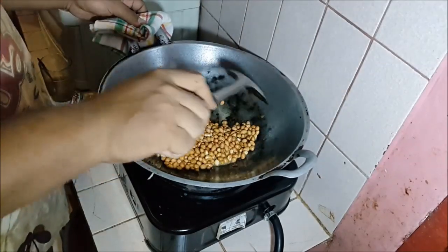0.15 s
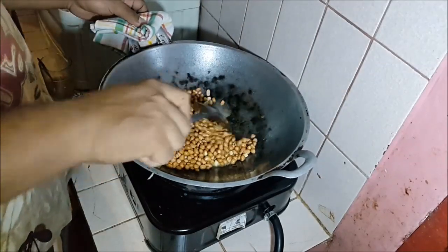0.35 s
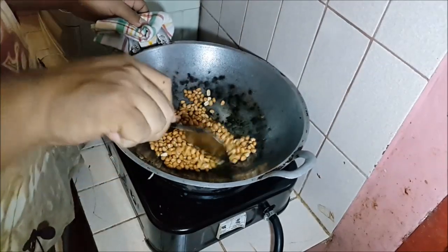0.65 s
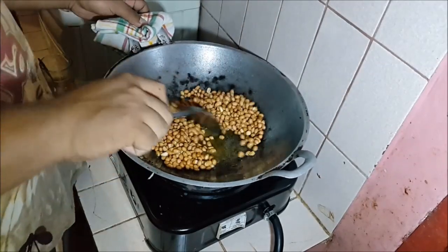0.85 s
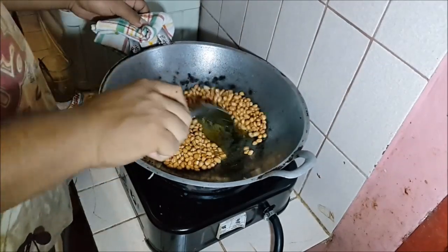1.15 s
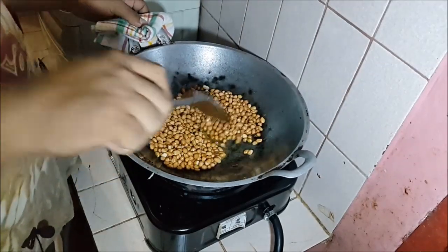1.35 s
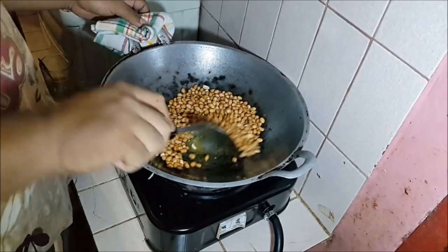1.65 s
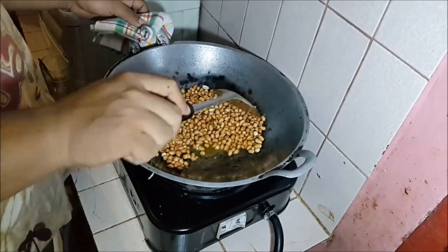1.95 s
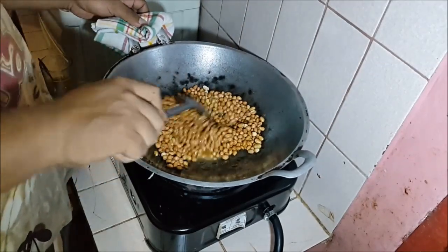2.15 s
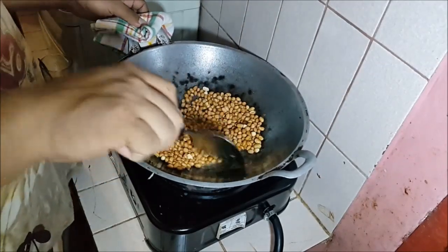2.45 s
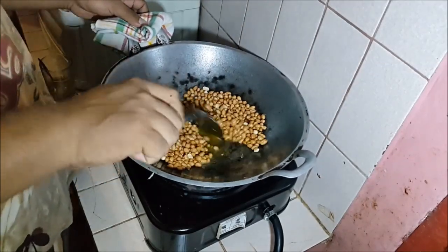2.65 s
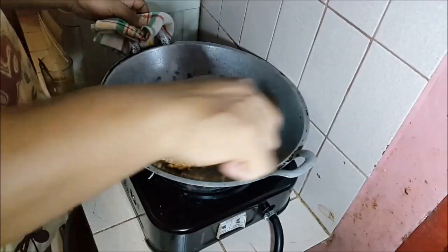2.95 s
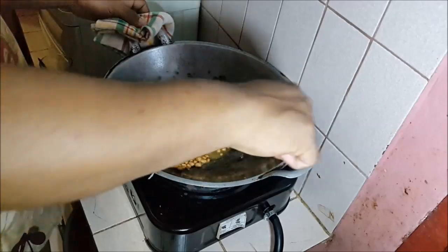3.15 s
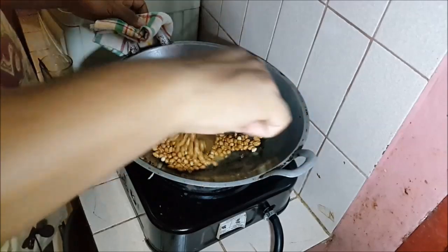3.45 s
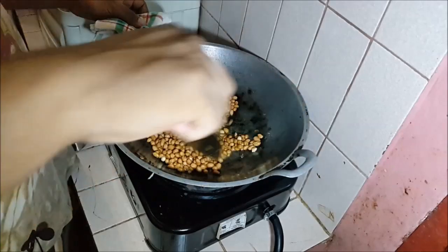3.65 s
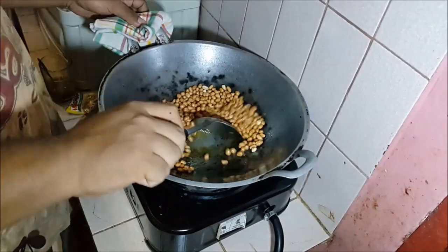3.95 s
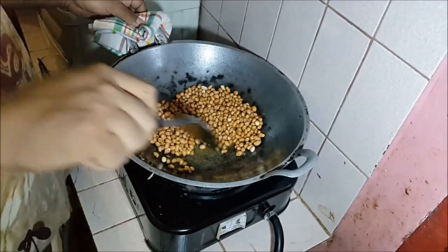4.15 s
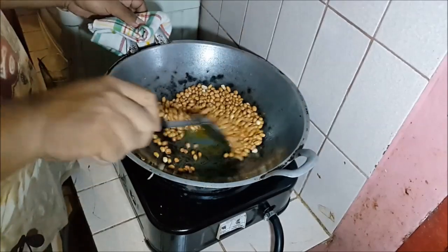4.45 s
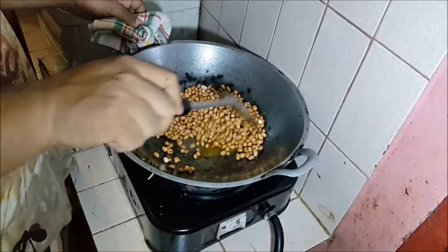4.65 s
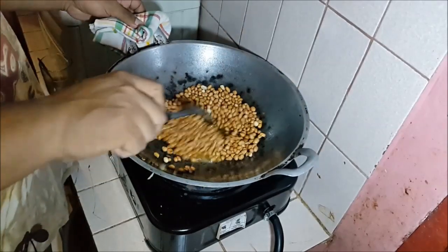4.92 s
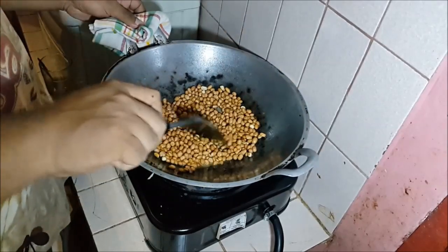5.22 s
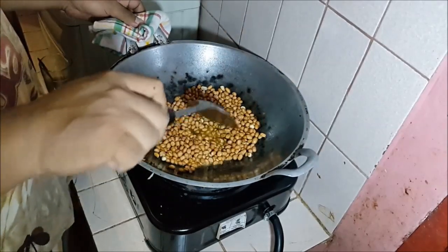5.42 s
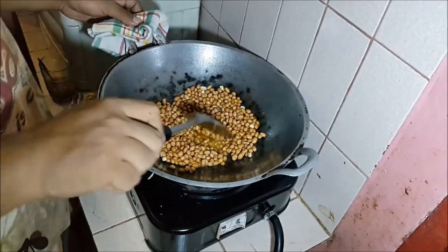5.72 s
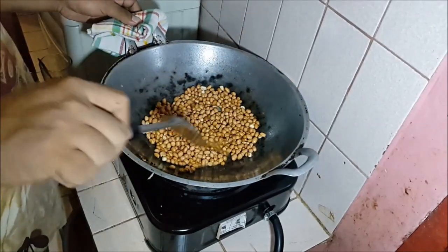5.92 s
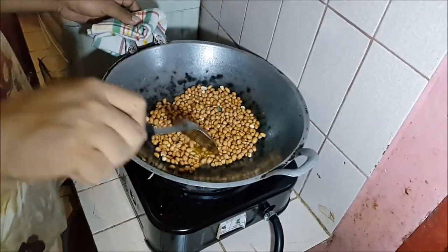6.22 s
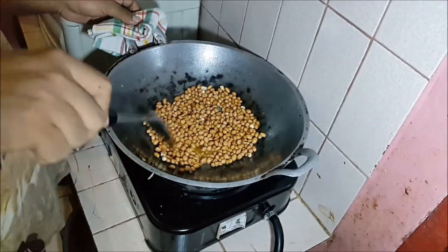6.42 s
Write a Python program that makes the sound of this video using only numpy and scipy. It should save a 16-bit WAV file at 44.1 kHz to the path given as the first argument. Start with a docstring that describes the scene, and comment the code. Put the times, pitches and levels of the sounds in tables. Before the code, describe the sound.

Close, dry-sounding stirring: the blade touches down with a short ring, pushes with a dull thud and rasps through a heap of nuts, then the steel wok bangs on its grate with a dense clang and duller rebounds. Knocks cluster in the first two seconds and recur irregularly. A gritty descending scrape comes midway; the end is softer thuds and clinks. Thin sizzle and low flame rumble lie beneath, with brief tile reflections.

```python
"""A metal spatula touches down and scrapes through peanuts frying in oil in a wok on a gas stove.
The wok knocks and chatters on the grate: struck modes, dense ringing and duller rebounds.
Blade landings ring, pushes thud, stick-slip grains scrape, and single nuts and a heap of them click.
Below lie sizzling oil (bubble and droplet bursts) and the burner's rumble (filtered noise).
Close tiled walls add a short echo; a left-right difference widens the stereo."""
import sys
import numpy as np
from scipy import signal
from scipy.fft import rfft, irfft
from scipy.io import wavfile
from scipy.ndimage import uniform_filter1d, minimum_filter1d

SR = 44100
rng = np.random.default_rng(int(sys.argv[2]) if len(sys.argv) > 2 else 0)


def generate_wav(sig):
    """Save sig (samples, or channels by samples) to the path in sys.argv[1] as 16-bit PCM at SR."""
    pcm = np.round(np.clip(np.atleast_2d(sig).T, -1, 1) * 32767).astype(np.int16)
    wavfile.write(sys.argv[1], SR, pcm)


N = 290160
TAIL_S = np.arange(SR * 3 // 4) / SR  # time axis of one blow


def amp(db):
    """Decibels to gain."""
    return 10 ** (np.asarray(db) / 20)


def unit(x):
    """Scales to rms 1."""
    return x / np.sqrt(np.mean(x ** 2) + 1e-20)


def read(points, hz):
    """Interpolates a spectrum table on a log-frequency axis."""
    f, value = np.transpose(points)
    return np.interp(np.log(hz + 1), np.log(f + 1), value)


def follow(rows):
    """Interpolates a (s, level dB) curve at every sample."""
    s, db = np.transpose(rows)
    return np.interp(np.arange(N) / SR, s, db)


def add(mix, s, sound):
    """Adds a sound at time s, cut at the end of the mix."""
    part = mix[max(round(s * SR), 0):][:len(sound)]
    part += sound[:len(part)]


def colour(x, points):
    """Filters by a spectrum table, with zero phase."""
    gain_db = read(points, np.fft.rfftfreq(len(x), 1 / SR))
    return irfft(rfft(x) * amp(gain_db), len(x))


def causal(x, points):
    """Minimum-phase colour: no sound before the blow; keeps the power of white noise."""
    hz = abs(np.fft.fftfreq(4096, 1 / SR))
    gain = np.maximum(unit(amp(read(points, hz))), 1e-5)
    taps = np.fft.ifft(np.exp(np.conj(signal.hilbert(np.log(gain))))).real
    return signal.fftconvolve(x, taps[:len(taps) // 2])[:len(x)]


def treble(hz, corner_hz):
    """Share 0-1 of a frequency that lies above a soft corner."""
    return 1 / (1 + (corner_hz / (hz + 1)) ** 5)


def grains(per_s, spread_db, count=N):
    """Random clicks of either sign at rms 1, their sizes spread exponentially in dB."""
    size = amp(spread_db * np.minimum(rng.exponential(1, count), 5))
    hit = rng.random(count) < per_s / SR
    return unit(size * rng.choice([-1, 1], count) * hit)


def snap(fall_s, after_db):
    """A sharp click followed by a brief scatter, total energy 1."""
    scatter = unit(rng.standard_normal(len(TAIL_S)) * np.exp(-TAIL_S / fall_s))
    click = amp(after_db) * scatter / np.sqrt(len(TAIL_S))
    click[0] += 1
    return click / np.linalg.norm(click)


def shifting(x, depth_db):
    """As the contact point moves, patches of resonance come and go."""
    z = signal.stft(x, SR, nperseg=512)[2]
    field = rng.standard_normal(z.shape)
    for _ in range(2):
        field = uniform_filter1d(field, size=3, axis=0)  # across frequency
        field = uniform_filter1d(field, size=7, axis=1)  # across time
    patches = unit(amp(depth_db * unit(field)))
    return signal.istft(z * patches, SR, nperseg=512)[1][:len(x)]


def ring(modes, weight=np.zeros_like, spread_db=0.5):
    """Dying sines; each blow lands elsewhere and weights them anew."""
    hz, db, t60_s = np.transpose(modes)
    size = amp(db + spread_db * rng.standard_normal(len(hz))) * rng.choice([-1, 1], len(hz))
    size *= amp(weight(hz)) / np.linalg.norm(size)
    hz, t60_s = hz[:, None], t60_s[:, None]
    swell = 1 - np.exp(-(2 * hz * TAIL_S) ** 2)  # a mode needs about a cycle to build up
    decay = np.exp(-np.log(1000) * TAIL_S / t60_s)
    return size @ (swell * decay * np.sin(2 * np.pi * hz * TAIL_S))


# Decay of the dense ringing. Each row: frequency in Hz, t60 in s.
DENSE_T60 = [(150, 0.11), (500, 0.36), (1500, 0.27), (4000, 0.44), (12000, 0.37)]


def dense_ring(points, weight, shape, patchy_db=3.5):
    """Countless close modes: fine grains whose bands die at their own speeds."""
    fine = shifting(grains(per_s=5000, spread_db=0.0, count=len(TAIL_S)), patchy_db)
    hz, t, z = signal.stft(fine, SR, nperseg=512)
    fall_db = weight(hz)[:, None] - 60 * t / read(DENSE_T60, hz)[:, None]
    ringing = signal.istft(z * amp(fall_db), SR, nperseg=512)[1][:len(TAIL_S)]
    return causal(shape * ringing, points)


# Flame and stove rumble. Each row: time in s, relative level in dB.
RUMBLE_CURVE = [(0.0, -43.5), (0.37, -42), (0.6, -54), (2.67, -53.5), (3.48, -58.5), (4.05, -51.5),
                (4.63, -59.5), (5.48, -54.5), (6.43, -44), (6.58, -38.5)]
# Burner colour. Each row: frequency in Hz, relative density in dB per Hz.
FLAME_COLOUR = [(20, -13), (42, -6), (80, 8.5), (170, 7), (250, -0.5), (420, 7.5), (750, 2), (1200, -22),
                (3000, -73)]


def flame(level_db=1, steady_db=-62):
    """Soft turbulent roar: the lows swell as the wok moves over the burner, the highs stay steady."""
    roar = unit(colour(rng.standard_normal(N), FLAME_COLOUR))
    high_share = treble(np.fft.rfftfreq(N, 1 / SR), corner_hz=228)
    high = irfft(rfft(roar) * high_share, N)
    return amp(follow(RUMBLE_CURVE) + level_db) * unit(roar - high) + amp(steady_db) * unit(high)


def bubbles(cycles):
    """Larger bubbles burst with a brief ping, each size at its own pitch."""
    t, out = TAIL_S[:512], np.zeros(N)
    for hz in np.geomspace(1500, 7000, num=22):
        age = t * hz / cycles
        ping = (1 - np.exp(-2 * age)) * np.exp(-age) * np.sin(2 * np.pi * hz * t)
        out += hz * signal.oaconvolve(grains(per_s=40, spread_db=-0.5), ping)[:N]
    return out


# Droplet bursts in the oil. Each row: frequency in Hz, relative density in dB per Hz.
SPIT_COLOUR = [(300, -15), (4000, 6), (6200, 1), (8300, -11), (11000, -1), (16000, -11)]


def droplets():
    """Water droplets spit sharply: random snaps with a brief scatter."""
    bursts = np.zeros(N)
    for _ in range(6):
        burst = snap(fall_s=.002, after_db=5)[:512]
        bursts += signal.oaconvolve(grains(per_s=60, spread_db=3.8), burst)[:N]
    return unit(causal(bursts, SPIT_COLOUR))


# Loudness of the sizzle, which dips and returns. Each row: time in s, relative level in dB.
SIZZLE_LEVEL = [(0.0, -50.5), (0.33, -54), (0.72, -70.5), (1.36, -68), (1.59, -68), (2.58, -61),
                (2.91, -75.5), (3.2, -78), (3.74, -73.5), (4.01, -53), (4.29, -70.5), (4.98, -77.5),
                (5.66, -70.5), (6.36, -56)]
# Oil colour. Each row: frequency in Hz, relative density in dB per Hz.
OIL_COLOUR = [(300, 28), (700, 28), (1500, 5), (3000, 25), (4300, 18), (6000, 9.5), (7200, 2.5),
              (8300, -18), (10000, 7.5), (11700, 8), (13500, -6), (16000, -1)]


def sizzle(hiss_db=13, pops_db=3, spits_db=6):
    """Countless steam bubbles burst in the oil; larger ones ping, droplets spit; one level curve drives all."""
    hiss = unit(colour(grains(per_s=4500, spread_db=2.8), OIL_COLOUR))
    pops = unit(colour(bubbles(cycles=3.5), OIL_COLOUR))
    oil = amp(hiss_db) * hiss + amp(pops_db) * pops + amp(spits_db) * droplets()
    return amp(follow(SIZZLE_LEVEL)) * oil


# Click of one nut. Each row: multiple of its pitch, relative density in dB.
NUT_COLOUR = [(.1, -34), (.62, -12), (1, 0), (1.5, -8), (2.2, -21), (8, -56)]


def nut_click(nut_hz, fall_s=0.0096, size_db=21):
    """A hard woody click around the pitch of one nut."""
    click = snap(fall_s, after_db=7)
    return amp(size_db) * causal(click, np.array(NUT_COLOUR) * [nut_hz, 1])


def heap(per_s, spread_db):
    """Nuts of many sizes click against each other and the steel."""
    pitches_hz, out = np.geomspace(1700, 4000, num=10), np.zeros(N)
    for hz in pitches_hz:
        click = causal(snap(fall_s=.002, after_db=-2)[:1024], np.array(NUT_COLOUR) * [hz, 1])
        out += signal.oaconvolve(grains(per_s / len(pitches_hz), spread_db), click)[:N]
    return unit(out)


# Wok knocks on the grate. Each row: start in s, relative level in dB, hardness as treble in dB,
# boom centre in Hz, chatter against the blow in dB.
WOK_KNOCKS = [(0.424, 3, -6.5, 610, -8.5), (0.458, -2.5, -7.5, 574, -6), (0.488, -12.5, 1.5, 700, -2),
              (0.9061, -4, -10, 730, -4), (0.922, -1.5, -10.5, 292, -30), (0.945, -1.5, -29, 450, -18),
              (0.987, -8.5, -31, 600, -6.5), (1.031, -19, -12, 420, -5), (1.1684, -8.5, -13.5, 574, -3.5),
              (1.205, -8, -16.5, 605, 3), (1.2969, -3.5, -25, 310, -10.5), (1.7944, -2.5, -6, 760, -5.5),
              (1.839, -5, -24, 320, -14), (2.643, -7.5, 2.5, 705, -4), (2.699, -11.5, -2.5, 290, 2.5),
              (2.771, -10.5, -16, 613, -28), (3.479, -22.5, -30, 298, -14), (3.940, -4, -1, 910, -5.5),
              (3.998, -21.5, 12.5, 400, 6), (4.035, -11, -44, 417, 6), (4.067, -16.5, -20, 415, 3.5),
              (4.5586, -3.5, -8, 830, -3), (4.613, -8.5, -17.5, 424, -14), (4.649, -17.5, -13, 580, -5.5),
              (5.1203, -6.5, -18.5, 376, -23)]
# Nuts dropping on the steel. Each row: start in s, relative level in dB, pitch in Hz.
NUT_DROPS = [(0.3684, -21, 2700), (0.796, -33, 3030), (1.122, -41, 3330), (1.235, -29, 2600),
             (1.262, -36.5, 4100), (1.315, -33, 2940), (1.456, -34, 2340), (1.9096, -33, 2840),
             (1.944, -26, 1900), (1.9606, -30.5, 2600), (2.079, -42.5, 3740), (2.2958, -31, 1900),
             (2.3585, -32.5, 3580), (2.432, -39, 2880), (2.484, -36.5, 2000), (2.832, -36, 2550),
             (3.538, -35.5, 2600), (3.6121, -34, 2580), (3.6457, -34.5, 2060), (3.7049, -29, 2070),
             (3.7382, -28, 3150), (3.904, -25.5, 3200), (4.145, -26, 1480), (4.2212, -33.5, 2280),
             (4.4688, -28, 2760), (4.8451, -37.5, 2250), (4.8833, -35.5, 2280), (5.382, -39, 2700),
             (5.7555, -25.5, 1870), (6.171, -23.5, 1710), (6.2241, -21.5, 2260)]


def peanuts(press, tumble_db=-15, settle_s=0.1, jump_db=-24, land_s=0.02):
    """Single nuts drop on the steel; the heap tumbles after each push and rattles when the wok knocks."""
    out, jolt = np.zeros(N), np.zeros(N)
    for s, db, nut_hz in NUT_DROPS:
        add(out, s, amp(db) * nut_click(nut_hz))
    for s, db, hard_db, _, _ in WOK_KNOCKS:
        add(jolt, s, amp(db + hard_db / 2 + jump_db) * np.exp(-TAIL_S / land_s))
    keep = np.exp(-1 / (settle_s * SR))
    motion = signal.lfilter([1 - keep], [1, -keep], press)
    tumble, rattle = heap(per_s=130, spread_db=3), heap(per_s=350, spread_db=2)
    return out + amp(tumble_db) * motion * tumble + jolt * rattle


# Pushes into wok and stove. Each row: start in s, relative level in dB, depth as bass in dB.
STOVE_THUDS = [(0.792, -28, -2), (1.696, -20.5, -2), (2.209, -29.5, -2), (2.249, -37.5, 4),
               (3.898, -18.5, -5.5), (4.464, -24.5, -4), (4.962, -34, -3), (5.368, -27.5, -2.5),
               (5.713, -35, 11), (6.149, -23.5, 0), (6.223, -22, 5.5)]
# Thud colour. Each row: frequency in Hz, relative density in dB per Hz.
THUD_COLOUR = [(25, -29), (45, -4.5), (85, -1), (130, -4), (200, 4), (280, -1.5), (450, -29.5),
               (1500, -25.5), (5000, -88.5)]


def thuds(rise_s=0.0021, fall_s=0.029):
    """A dull push through the wok into the stove; a deep one moves the whole stove."""
    out = np.zeros(N)
    shape = (1 - np.exp(-TAIL_S / rise_s)) * np.exp(-TAIL_S / fall_s)
    for s, db, depth_db in STOVE_THUDS:
        push = colour(rng.standard_normal(len(TAIL_S)), [(130, depth_db), (200, 0)])
        add(out, s, amp(db) * causal(shape * push, THUD_COLOUR))
    return out


# Modes of the wok. Each row: frequency in Hz, relative level in dB, t60 in s.
WOK_MODES = [(171.8, -17.5, 0.62), (268.7, -14, 0.58), (294.7, -4, 0.33), (303.8, -5.5, 0.49),
             (385.7, -3, 0.31), (427, 0.5, 0.22), (492, -8, 0.37), (588.7, 0.5, 0.2), (723, 3.5, 0.13),
             (762.3, -1.5, 0.22), (1103, -6.5, 0.2), (1285, -22, 0.077), (1540, -4.5, 0.35),
             (1933, 2.5, 0.17), (2243, 3.5, 0.06), (2700, -11.5, 0.2), (2905, 3, 0.084), (2990, -11, 0.15),
             (3800, -21, 0.12), (3500, -13.5, 0.21)]
# Dense ringing of wok, grate and stove. Each row: frequency in Hz, relative density in dB.
CLATTER_COLOUR = [(40, -61.5), (135, -23.5), (190, 9.5), (400, 3.5), (780, 0), (1100, 0), (2100, 4.5),
                  (4100, -4.5), (5500, -19.5), (8000, -49.5), (11000, -34.5), (16000, -56)]


def strike(hard_db, boom_hz, node_hz, node_db, modes_db=-2, dense_db=-8, surge_db=8.5, surge_s=0.017,
           boom_db=5, boom_octaves=0.33, node_octaves=0.34, sway_db=6, sway_per_hard=0.18):
    """One contact of wok and grate; a harder one wakes the high modes and sways the whole bowl."""
    def weight(hz):
        boom = np.exp(-(np.log2((hz + 1) / boom_hz) / boom_octaves) ** 2)
        node = np.exp(-(np.log2((hz + 1) / node_hz) / node_octaves) ** 2)
        bass = 1 - treble(hz, corner_hz=255)
        hard = (hard_db + 1.5) * treble(hz, corner_hz=1270)
        sway = (sway_db + sway_per_hard * hard_db) * bass
        return hard + boom_db * (boom - .5) + node_db * node + sway

    surge = 1 + amp(surge_db) * np.exp(-TAIL_S / surge_s)  # the grate drains the first surge quickly
    modes = surge * ring(WOK_MODES, weight)
    return amp(modes_db) * modes + amp(dense_db) * dense_ring(CLATTER_COLOUR, weight, surge)


# Seats of the wok on the grate, on the node of some modes.
# Each row: start in s, band centre in Hz, its level change in dB.
GRATE_SEATS = [(0, 2370, -21), (0.7, 1789, -5), (1.1, 3430, -7), (1.5, 1820, -9), (2.4, 1480, -9.5),
               (3.4, 2070, -10.5), (4.4, 3580, 2)]
# Broadband crack at the onset of a knock. Each row: frequency in Hz, relative density in dB per Hz.
CRACK_COLOUR = [(500, -9), (4000, 11), (6000, 4), (8000, -6), (11000, 0), (16000, -2)]
REBOUND_DB, REBOUND_HZ = -7, 440  # treble against the blow, boom centre
CRACK_DB, CRACK_S = -16.5, .0006  # level against the knock's treble, decay


def knocks(level_db=-9.0, chatter_s=0.029):
    """The wok hits the grate, a brief broadband crack at the onset, then chatters in quick, duller rebounds."""
    out = np.zeros(N)
    for s, db, hard_db, boom_hz, chatter_db in WOK_KNOCKS:
        _, node_hz, node_db = [seat for seat in GRATE_SEATS if seat[0] <= s][-1]
        blow = strike(hard_db, boom_hz, node_hz, node_db)
        rebound = strike(hard_db + REBOUND_DB, REBOUND_HZ, node_hz, node_db)
        bounces = grains(per_s=400, spread_db=0.0, count=len(TAIL_S)) * np.exp(-TAIL_S / chatter_s)
        chatter = unit(signal.fftconvolve(rebound, bounces)[:len(TAIL_S)]) * np.std(blow)
        crack = causal(rng.standard_normal(len(TAIL_S)) * np.exp(-TAIL_S / CRACK_S), CRACK_COLOUR)
        body = amp(level_db) * (blow + amp(chatter_db) * chatter)
        add(out, s, amp(db) * (body + amp(hard_db + CRACK_DB) * crack))
    return out


# Blade strokes through the nuts. Each row: start in s, length in s, pressure in dB,
# bite of the edge as treble in dB.
BLADE_STROKES = [(0, 0.097, -25, -1.5), (0.762, 0.11, -38.5, 0), (0.83, 0.18, -28.5, -7),
                 (1.025, 0.095, -37.5, 7), (1.189, 0.14, -28, -3.5), (1.665, 0.19, -26.5, -1),
                 (2.193, 0.05, -26, -21), (2.273, 0.13, -35, 3), (2.626, 0.059, -30.5, -6),
                 (3.205, 0.17, -36.5, -8), (3.336, 0.22, -35, -3), (3.612, 0.17, -38, 0.5),
                 (3.95, 0.035, -27, 12.5), (4.146, 0.023, -35, -19), (4.476, 0.21, -35, -0.5),
                 (4.945, 0.028, -26, -10), (5.339, 0.045, -31, -16), (5.676, 0.095, -30.5, -2.5),
                 (5.874, 0.25, -44, 0), (6.134, 0.1, -29, 2.5), (6.218, 0.049, -20.5, -22),
                 (6.361, 0.066, -37.5, -20)]
PRESS_S, LET_GO_S = 0.027, 0.038
SLIDE_DB, SLIDE_S = -3.5, 0.1  # the nuts slide on more softly
REST_DB = -86  # the blade rests in the heap between strokes


def pushing():
    """Force of the blade and of its biting edge: each stroke presses in, holds and lets go."""
    t = np.arange(N) / SR
    press, bite = np.full(N, amp(REST_DB)), np.full(N, amp(REST_DB))
    for start_s, length_s, db, bite_db in BLADE_STROKES:
        after = np.maximum(t - start_s - length_s, 0)
        slide = amp(SLIDE_DB) * np.exp(-after / SLIDE_S)
        release = np.maximum(np.exp(-after / LET_GO_S), slide)
        force = amp(db) * np.clip((t - start_s) / PRESS_S, 0, 1) * release
        press, bite = np.hypot(press, force), np.hypot(bite, amp(bite_db) * force)
    return press, bite


# Blade rubbing on steel. Each row: frequency in Hz, relative density in dB per Hz.
RUB_COLOUR = [(60, -25), (140, -2.5), (230, 13.5), (400, 5.5), (750, 7), (1100, 6), (1550, 7), (2200, 1),
              (3500, -5.5), (4800, -19), (6500, -37), (8500, -49), (12000, -41.5), (16000, -60)]


def scrape(press, bite, body_db=-2, wok_db=-9, patchy_db=4):
    """Stick and slip: tiny catches of the blade and nuts ring the wok; a biting edge adds rasp."""
    slips = press * grains(per_s=2300, spread_db=2.0)
    rub = causal(shifting(slips, patchy_db), RUB_COLOUR)
    rasp = causal(bite * grains(per_s=900, spread_db=2.5), RUB_COLOUR)
    high = treble(np.fft.rfftfreq(N, 1 / SR), corner_hz=2180)
    contact = irfft(amp(body_db) * rfft(rub) * (1 - high) + rfft(rasp) * high, N)
    tone = ring(WOK_MODES, lambda hz: -8 * treble(hz, corner_hz=1200))
    return contact + amp(wok_db) * signal.fftconvolve(slips, tone / np.linalg.norm(tone))[:N]


def resonate(x, hz, width_hz):
    """A resonance that follows the curve hz."""
    turn, r = np.exp(2j * np.pi * np.cumsum(hz) / SR), np.exp(-np.pi * width_hz / SR)
    return 2 * (turn * signal.lfilter([1 - r], [1, -r], x / turn)).real


# Long drag down the far wall. Each row: time in s, relative level in dB, factor on the gap resonances.
DRAG_CURVE = [(3.193, -54.5, 0.92), (3.21, -37.5, 0.91), (3.33, -36, 0.96), (3.36, -29, 0.9),
              (3.39, -37, 0.79), (3.415, -33, 0.82), (3.499, -58, 0.69)]
# Resonances of the gap under the blade. Each row: base frequency in Hz, width in Hz, relative level in dB.
GAP_MODES = [(1120, 76, 11), (1600, 130, -3), (2900, 400, 2), (3860, 270, 3.5), (5100, 200, -1)]
# Dry edge catching on the wall. Each row: frequency in Hz, relative density in dB per Hz.
GRIT_COLOUR = [(150, -10.5), (400, 12), (4200, 1), (6400, -4), (8300, -38), (11000, -24), (16000, -45)]


def drag(level_db=-2.0, grit_db=-8, patchy_db=3):
    """The edge judders down the wall in gritty catches; the gap under it opens and its resonances fall."""
    s, db, factor = np.transpose(DRAG_CURVE)
    t = np.arange(s[0], s[-1], 1 / SR)
    catches = grains(per_s=1300, spread_db=1.8, count=len(t))
    slips, glide = shifting(catches, patchy_db), np.interp(t, s, factor)
    song = np.zeros(len(t))
    for hz, width_hz, size_db in GAP_MODES:
        once = resonate(slips, hz * glide, width_hz)
        song += amp(size_db) * resonate(once, hz * glide, width_hz)
    grit = amp(grit_db) * causal(catches, GRIT_COLOUR)
    out = np.zeros(N)
    add(out, s[0], amp(level_db + np.interp(t, s, db)) * (unit(song) + grit))
    return out


# Spatula landings; the close rows around 6.25 s form a short hard scrape. Each row: start in s, relative level
# in dB, treble in dB, free blade ring in dB.
BLADE_CLINKS = [(0.0014, -16.5, -2, -1.5), (0.0225, -17.5, -6, -13), (0.0665, -24, 5, 4.5),
                (0.773, -28, 7, -12), (0.793, -25, -2, -1), (1.6573, -27, -7.5, 1),
                (1.6825, -17.5, -0.5, -4), (2.199, -24, -7, 0.5), (2.2073, -25.5, -1.5, 2),
                (2.2494, -15, -13, -9), (2.872, -49, -34, 24.5), (3.1983, -20.5, 11.5, -18),
                (3.21, -35, -15.5, 3.5), (3.9, -23, 9, -8), (4.461, -31.5, 5, 0.5), (4.7576, -27.5, -1, -8),
                (4.9555, -22, -10, -8), (5.379, -25, -8, -2), (5.68, -24, 3.5, 6.5),
                (6.1404, -20.5, 0.5, -10), (6.1868, -27.5, 6, 9), (6.2521, -14, 3.5, -19),
                (6.258, -16, -11, -2), (6.277, -10.5, -20, -4.5)]
# Modes of the spatula. Each row: base frequency in Hz, relative level in dB, t60 in s.
BLADE_MODES = [(1390, -6.5, 0.2), (1490, 7, 0.12), (1554, -2.5, 0.09)]


def clinks(dense_db=-3, fall_s=0.025, detune=0.02):
    """The blade touches down or scrapes hard: its short ring and a light stir of the wok; nuts cushion dull
    landings."""
    out = np.zeros(N)
    for s, db, edge_db, ring_db in BLADE_CLINKS:
        def weight(hz):
            return edge_db * treble(hz, corner_hz=2700)

        steel = dense_ring(RUB_COLOUR, weight, np.exp(-TAIL_S / fall_s))
        pitch = 1 + detune * (2 * rng.random() - 1)
        blade = ring(np.array(BLADE_MODES) * [pitch, 1, 1])
        seating = 1 - np.exp(-TAIL_S * amp(edge_db) / .0006)  # brighter landings rise faster
        add(out, s, amp(db) * seating * (amp(ring_db) * blade + amp(dense_db) * steel))
    return out


def dense_echo(x, wet_db, t60_s, gap_s=0.0063):
    """Adds a dense decaying echo of random taps after a short gap."""
    hit = (rng.random(len(TAIL_S)) < 2500 / SR) * (TAIL_S > gap_s)
    echo = rng.choice([-1, 1], len(TAIL_S)) * hit * amp(-60 * TAIL_S / t60_s)
    return x + amp(wet_db) * signal.fftconvolve(x, echo / np.linalg.norm(echo))[:N]


def kitchen(x):
    """Close tiled walls return a short dense echo."""
    return dense_echo(x, wet_db=-12, t60_s=0.34)


# Balance of the two ports. Each row: frequency in Hz, left minus right in dB.
PORT_BALANCE = [(1200, 0), (3300, -3.3), (5400, -10), (8300, 1), (11000, .3)]
# Stereo width. Each row: frequency in Hz, level of the left-right difference against common sound in dB.
SIDE_COLOUR = [(40, -31), (150, -66), (500, -40.5), (2000, -28.5), (5000, -13), (8300, -20), (11000, -12),
               (16000, -26)]


def scene():
    """All sources in the kitchen, heard by two closely spaced ports."""
    press, bite = pushing()
    cooking = sizzle() + peanuts(press) + thuds() + drag() + scrape(press, bite) + clinks() + knocks()
    air = kitchen(cooking) + flame()
    side = colour(dense_echo(air, wet_db=-1.5, t60_s=0.033) - air, SIDE_COLOUR)
    lean = amp(read(PORT_BALANCE, np.fft.rfftfreq(N, 1 / SR)) / 2)
    return irfft([rfft(air + side) * lean, rfft(air - side) / lean], N)


EDGE_HZ = 15650


def record(dry):
    """A limiter turns the loudest peaks down; then a low-pass sets the band limit."""
    room = np.minimum(.92 / (abs(dry).max(0) + 1e-9), 1)
    limited = dry * uniform_filter1d(minimum_filter1d(room, size=301), size=301)
    low_pass = signal.firwin(511, EDGE_HZ, window=("kaiser", 9), fs=SR)
    return signal.oaconvolve(limited, low_pass[None], "same")


dry = scene()
out = record(dry)
generate_wav(out)
```